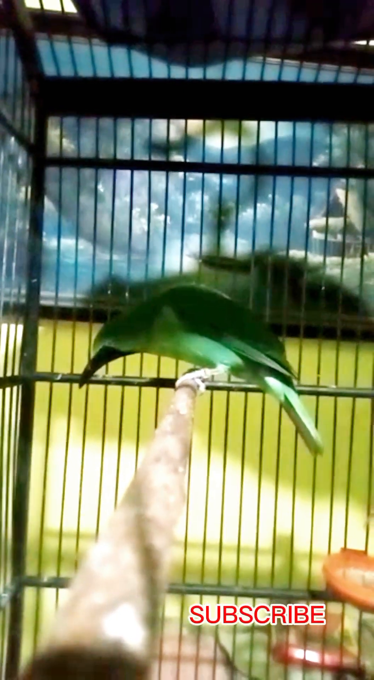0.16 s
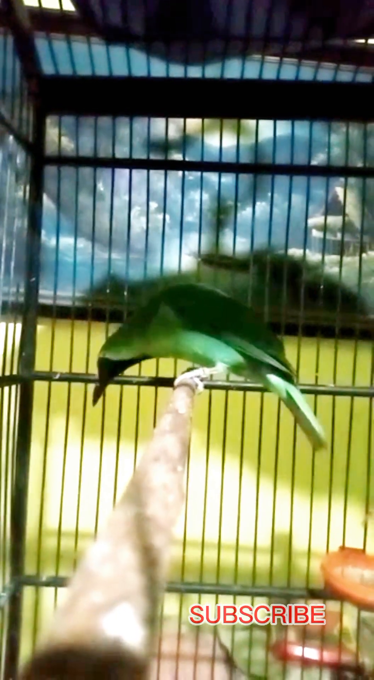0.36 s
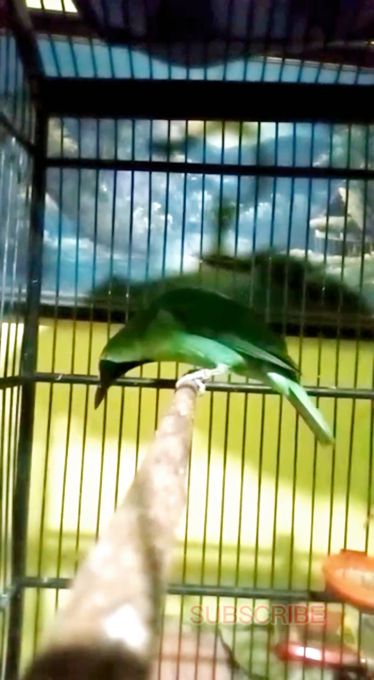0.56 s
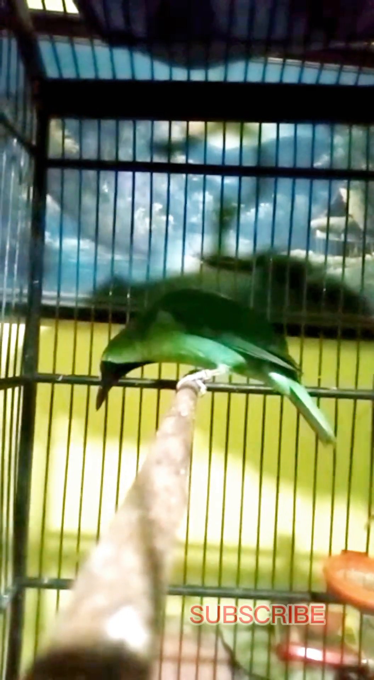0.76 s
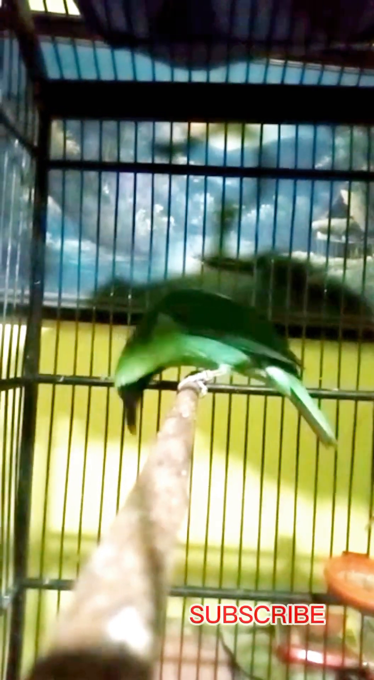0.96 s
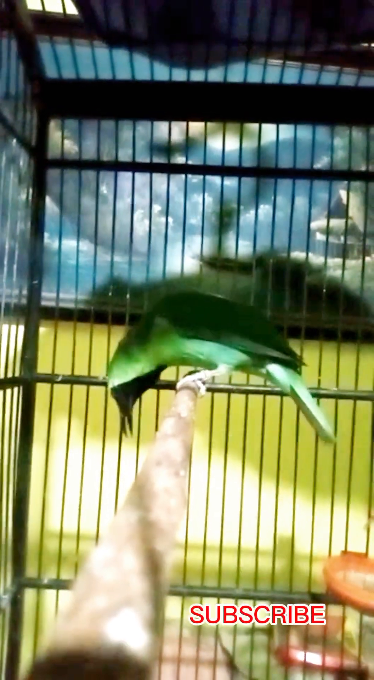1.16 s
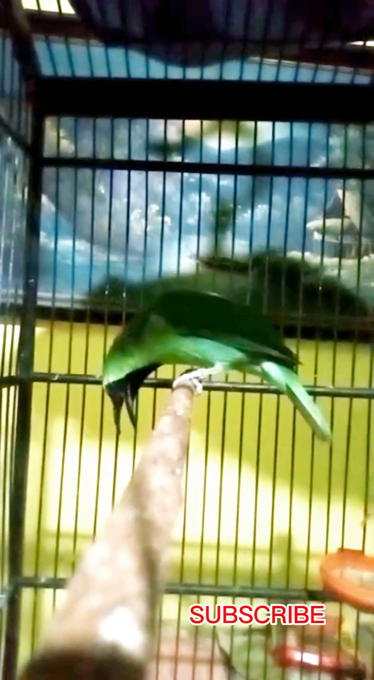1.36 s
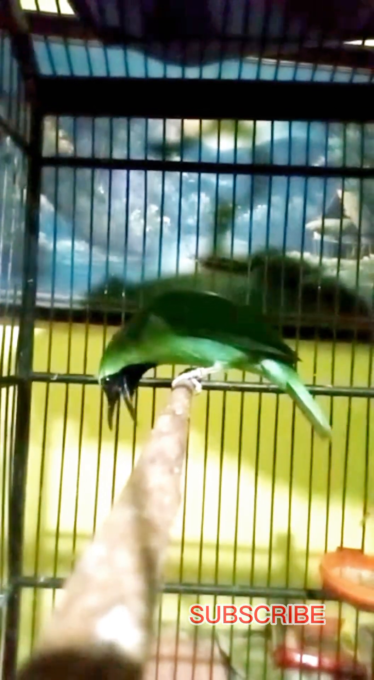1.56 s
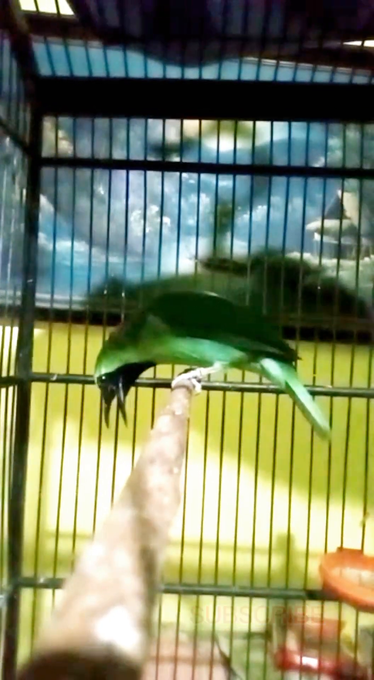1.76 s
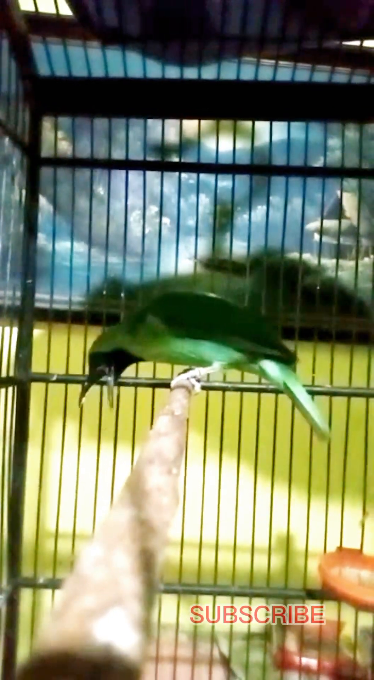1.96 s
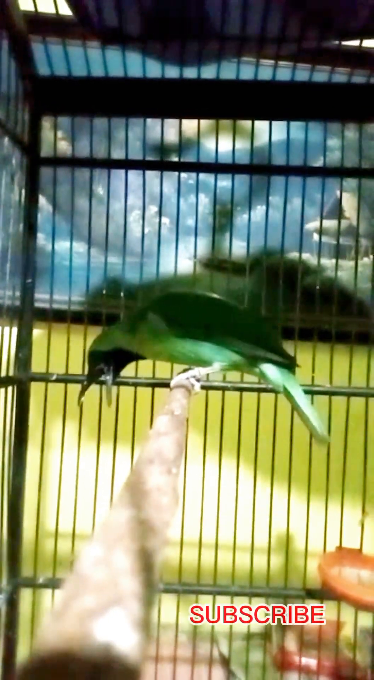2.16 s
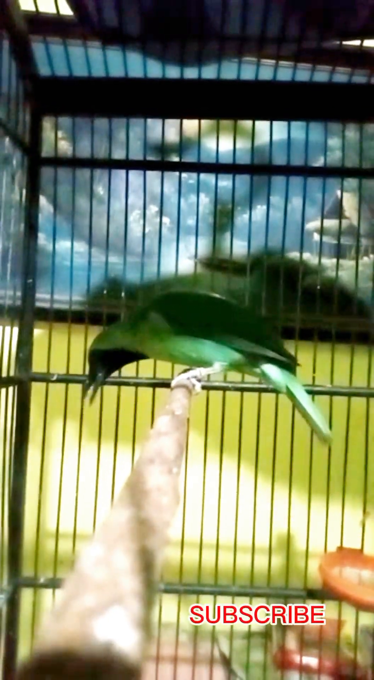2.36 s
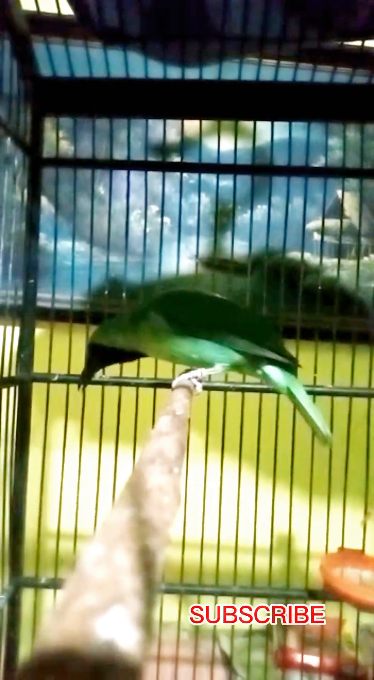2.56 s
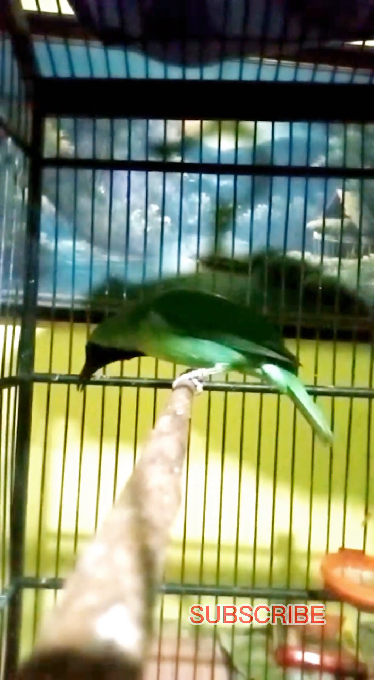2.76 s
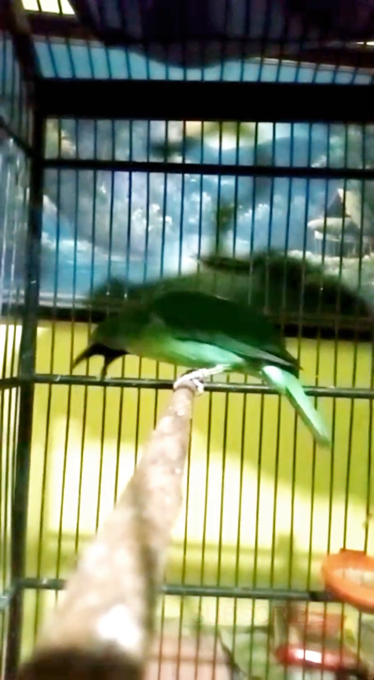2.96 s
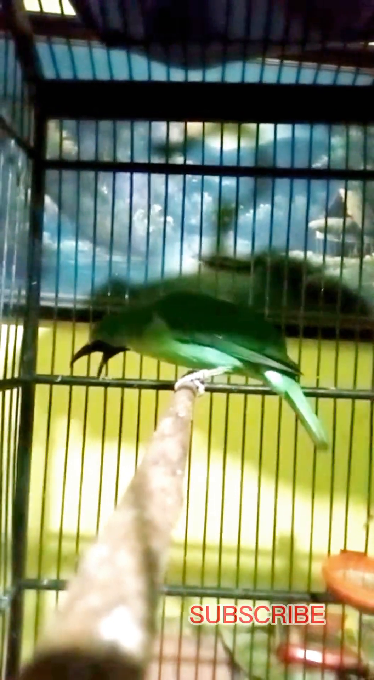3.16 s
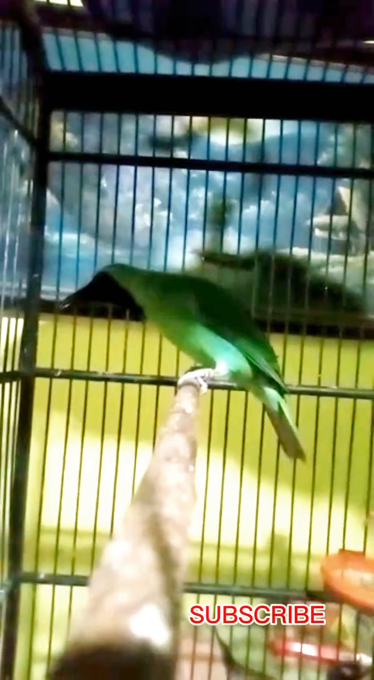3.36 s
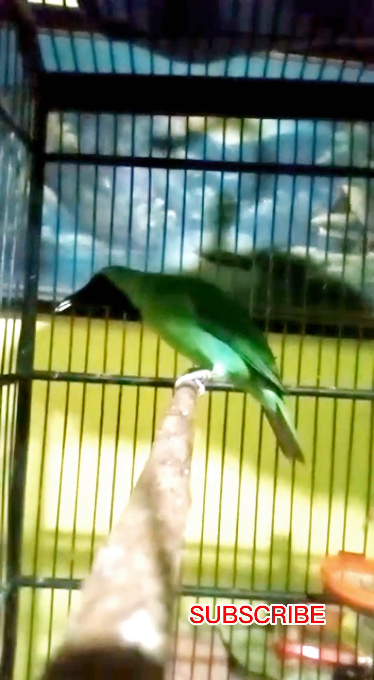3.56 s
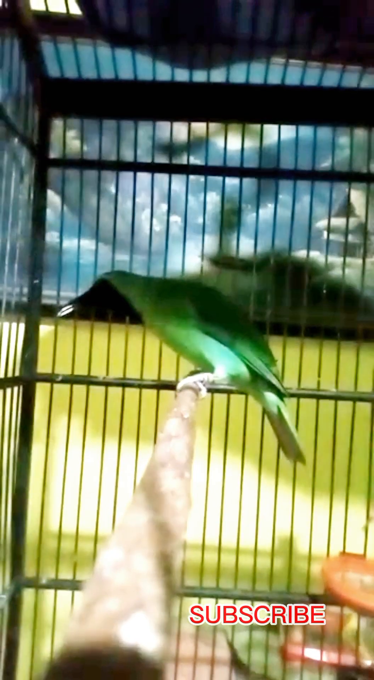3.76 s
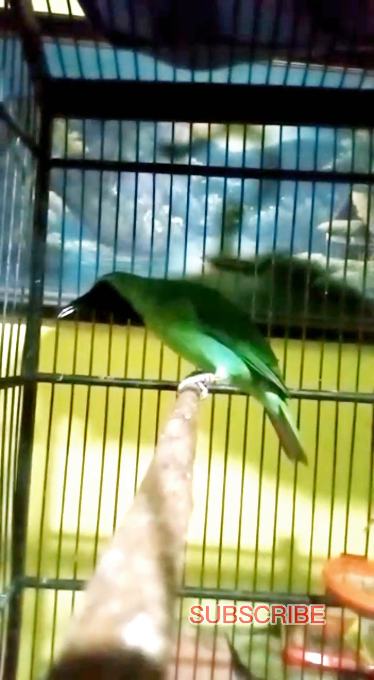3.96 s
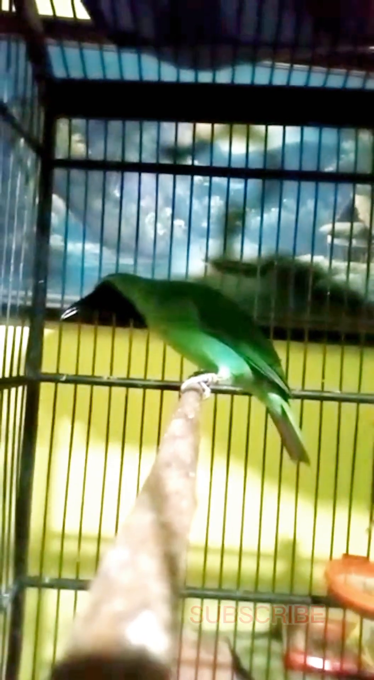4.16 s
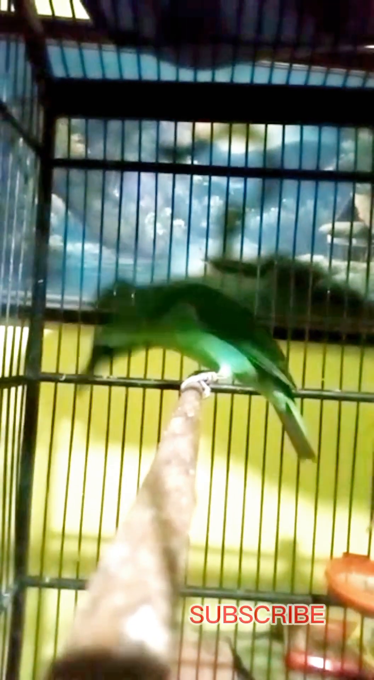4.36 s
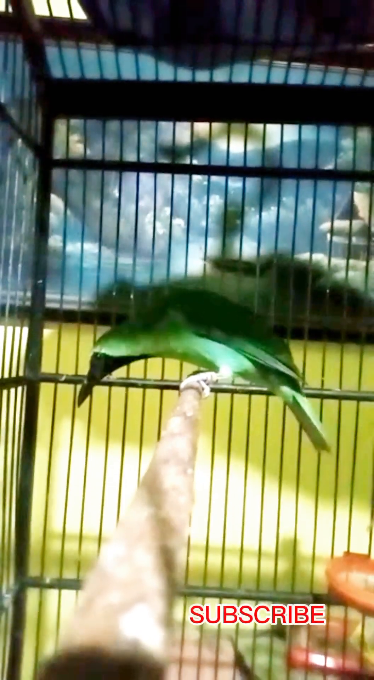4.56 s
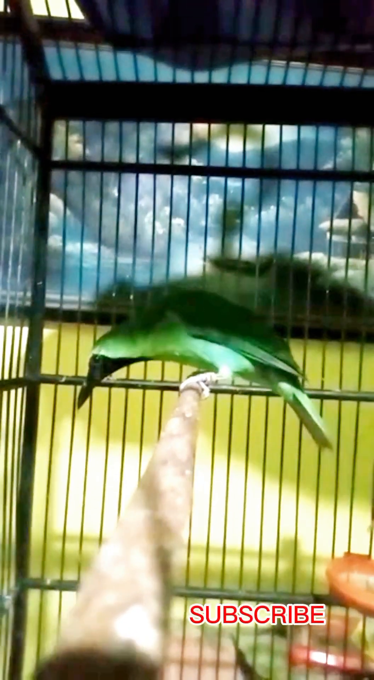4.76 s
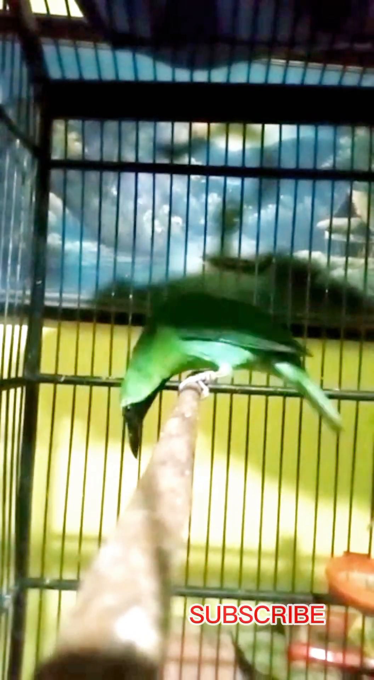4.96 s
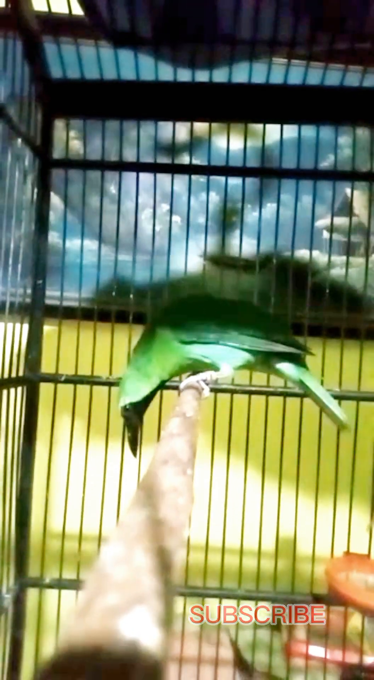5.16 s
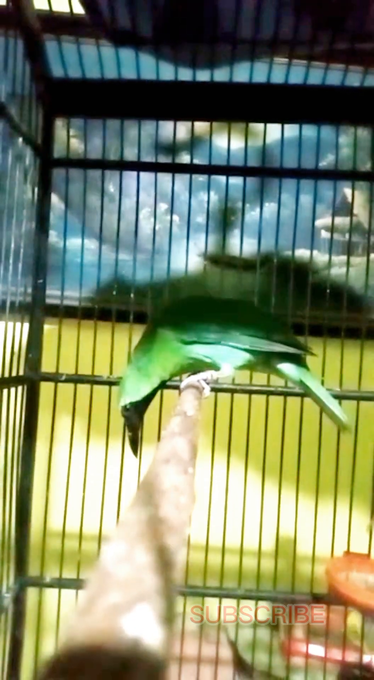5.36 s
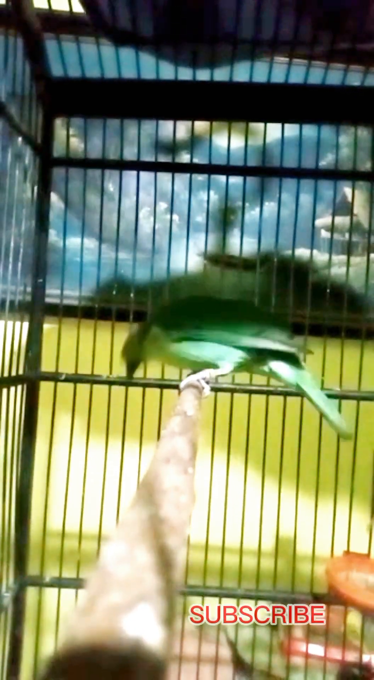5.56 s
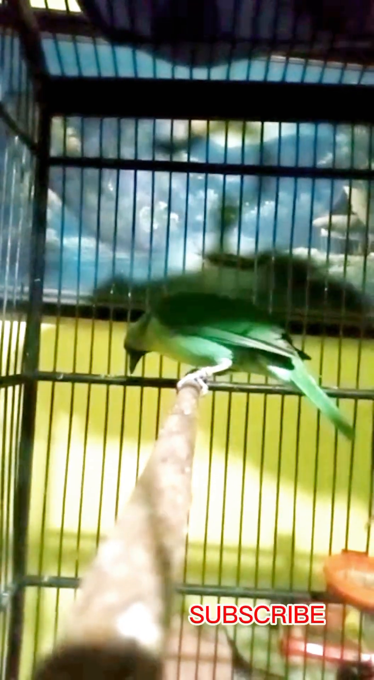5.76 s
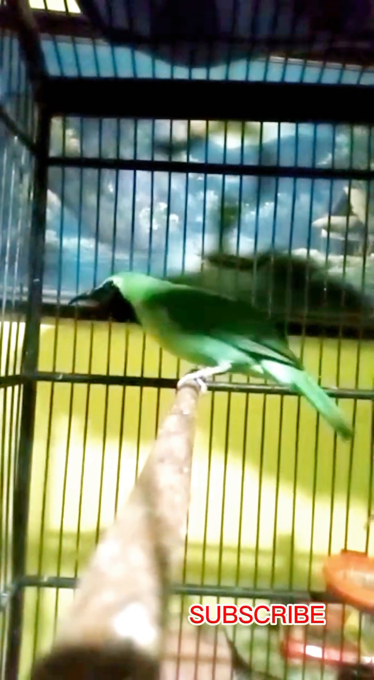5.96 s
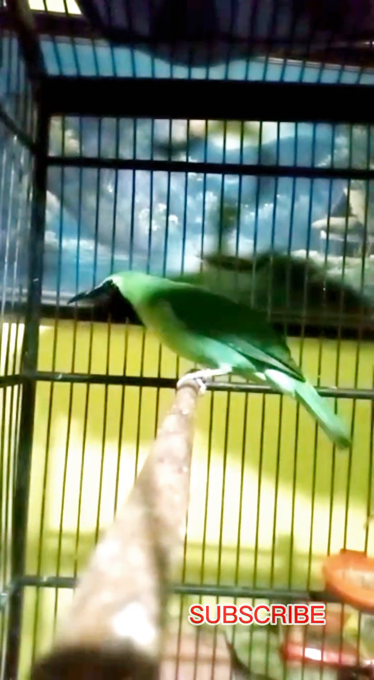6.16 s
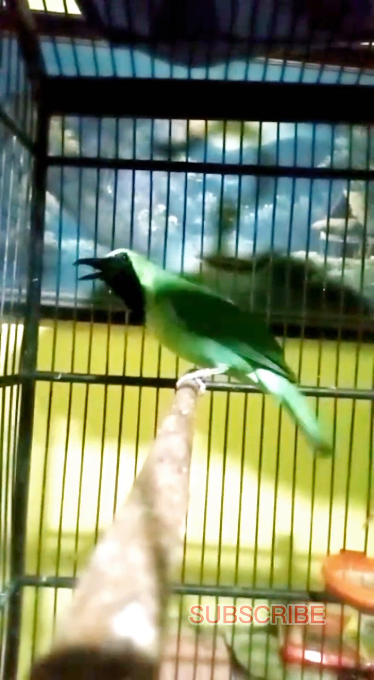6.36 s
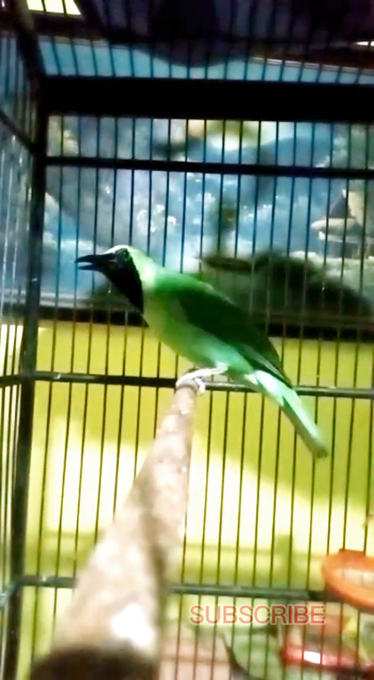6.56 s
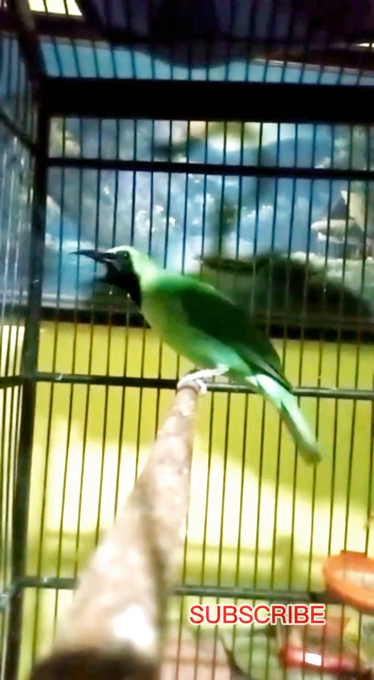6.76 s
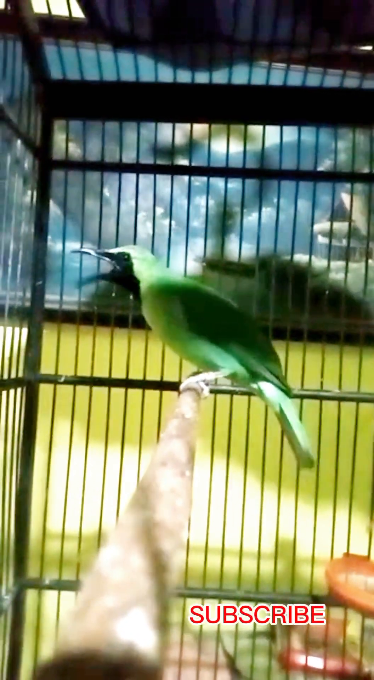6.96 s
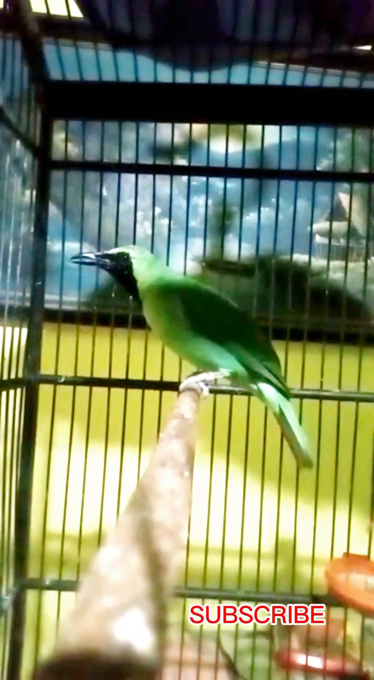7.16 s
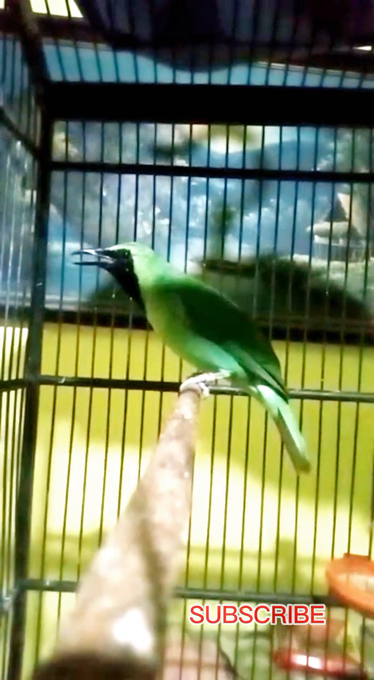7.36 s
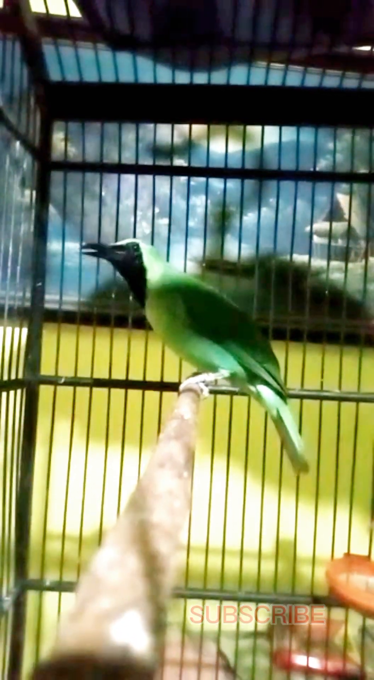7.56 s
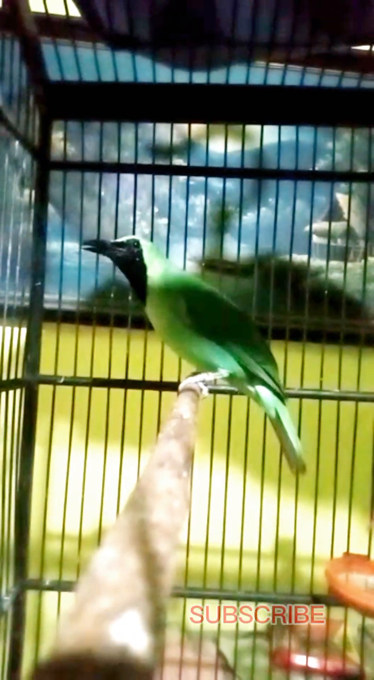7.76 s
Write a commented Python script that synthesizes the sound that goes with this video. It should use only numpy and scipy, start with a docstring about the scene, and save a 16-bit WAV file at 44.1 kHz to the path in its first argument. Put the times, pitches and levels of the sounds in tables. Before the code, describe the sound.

Bright bursts of whistled notes, chattering chips and rapid downward trills from a close bird, with distant harsh rasps, blurred whistles and a faint wavering hum.

```python
"""A caged songbird sings close by in a hard-walled room: whistles, chips and falling trills, built from
nearly pure gliding tones with overtones, breath and a reverberant tail. Tongue ticks, air puffs and thuds go with it.
Farther off, rasping calls (fluttering noise) and blurred whistles of another bird sound over a wavering low hum.
Thin tones, soft rustles and dull knocks are fainter still. Gain control ducks the hum under the song,
a limiter catches the loudest notes, and a cut with short fades joins two shots."""
import sys
import numpy as np
from scipy import signal
from scipy.io import wavfile
from scipy.ndimage import uniform_filter1d, minimum_filter1d

SR = 44100
rng = np.random.default_rng(int(sys.argv[2]) if len(sys.argv) > 2 else 0)


def unload_wav(signal):
    """Save mono or channel-first audio to the path in sys.argv[1] as 16-bit WAV at rate SR, clipped to [-1, 1]."""
    wavfile.write(
        sys.argv[1],
        SR,
        np.round(np.clip(np.atleast_2d(signal).T, -1, 1) * 32767).astype(np.int16),
    )


N = 348390
CUT_S = 3.311  # the cut between the two shots

# falling trill notes: (time [s], length [s], high pitch [Hz], low pitch [Hz], level [dB])
FALL_NOTES = [(1.976, 0.027, 5600, 3960, 9.5), (2.045, 0.03, 6600, 3897, 10.7),
              (2.112, 0.032, 6500, 3910, 10.3), (2.185, 0.03, 6700, 3908, 8.3),
              (2.252, 0.028, 6600, 4088, 6.5), (2.896, 0.036, 6300, 4287, 8.6),
              (2.965, 0.045, 6777, 4353, 11.55), (3.035, 0.042, 7094, 4283, 13),
              (3.104, 0.042, 6800, 4257, 10.5), (3.173, 0.04, 6800, 4290, 10.9),
              (3.248, 0.038, 6700, 4055, 7.9)]
# sliding notes: (time [s], length [s], high pitch [Hz], low pitch [Hz], level [dB])
SLIDE_NOTES = [(6.814, 0.04, 5776, 3676, 8.9), (6.891, 0.029, 6134, 3675, 12.4),
               (6.965, 0.025, 5790, 3960, 12.2), (7.041, 0.04, 5480, 3682, 10.9)]


def amp(db):
    """Turns dB into gain."""
    return 10 ** (np.asarray(db) / 20)


def evened(x):
    """Scales to rms 1."""
    return x / np.sqrt(np.mean(x ** 2) + 1e-20)


def smoothed_noise(length, size):
    """Slow random drift: white noise averaged twice over size samples, at rms 1."""
    white = rng.standard_normal(length)
    return evened(uniform_filter1d(uniform_filter1d(white, size=size), size=size))


def read(points, hz):
    """Reads a spectrum on a log-frequency axis."""
    f, value = np.transpose(points)
    return np.interp(np.log(hz + 1), np.log(f + 1), value)


def peaks(modes, hz):
    """Resonances as bumps in dB, each falling to half its dB at half its width from the centre."""
    return sum(db / (1 + (2 * (hz - f) / width) ** 2) for f, width, db in modes)


def envelope(times, levels_db):
    """Gain over the whole scene, silent outside the given times."""
    return amp(np.interp(np.arange(N) / SR, times, levels_db, left=-150, right=-150))


def add(mix, s, sound):
    """Mixes a sound in at time s."""
    part = mix[round(s * SR):][:len(sound)]
    part += sound[:len(part)]


def noise(colour_db, patchy_db):
    """Coloured noise from random 512-sample spectra whose level drifts in patches of time and pitch."""
    a, b, patches = rng.standard_normal((N // 128 + 5, 257, 3)).T
    patches = uniform_filter1d(patches, size=5, axis=0)
    patches = evened(uniform_filter1d(patches, size=14, axis=1))
    z = (a + 1j * b) * amp(colour_db[:, None] + patchy_db * patches)
    return evened(signal.istft(z, nperseg=512, noverlap=384)[1][:N])


def bursts(events, low_hz, high_hz, rise, decay):
    """Short bursts of band noise with set peaks; rise and decay are time constants in seconds."""
    out, t = np.zeros(N), np.arange(7000) / SR
    band = signal.butter(2, [low_hz, high_hz], "band", fs=SR, output="sos")
    for s, db in events:
        swell = (1 - np.exp(-t / rise)) * np.exp(-t / decay)
        burst = signal.sosfilt(band, rng.standard_normal(len(t)) * swell)
        add(out, s, amp(db) * burst / abs(burst).max())
    return out


def whistle(hz, db, overtones_db, breath_db, size):
    """A nearly pure syrinx tone; uneven overtones fade less than the tone; breath noise sits just under it."""
    # (multiple of the pitch, level at full effort before the note's brightness [dB])
    overtones = [(2, -43), (3, -55), (4, -61), (5, -63.5)]
    # beak resonance, lifts the overtones that cross it: (centre [Hz], width [Hz], lift [dB])
    beak = [(7700, 880, 9.5)]
    turn = 2 * np.pi * (np.cumsum(uniform_filter1d(hz, size=60)) / SR + rng.random())
    uneven = 1 + .4 * evened(uniform_filter1d(rng.standard_normal(len(hz)), size=300))
    upper = 0
    for k, d in overtones:
        audible = k * hz < SR / 2  # nothing above half the sample rate
        upper = upper + amp(d + peaks(beak, k * hz)) * np.sin(round(k) * turn) * audible
    breath = np.sin(.84 * turn) * smoothed_noise(len(hz), size)
    overtone_gain = amp(overtones_db - 0.56 * (db - db.max()))
    tone = np.sin(turn) + overtone_gain * uneven * upper + amp(breath_db) * breath
    soft_ends = signal.windows.tukey(len(hz), min(1, 200 / len(hz)))
    return amp(db) * tone * soft_ends


def hum():
    """Lumpy low rumble in narrow bands with a faint hiss above it, its level wavering."""
    # spectrum: (frequency [Hz], relative level [dB])
    hum_colour = [(20, -55.5), (45, -36.5), (65, -8.5), (100, -12), (200, -10), (290, -13), (490, -36),
                  (800, -34.5), (1600, -29.5), (2800, -29), (5000, -50), (15000, -68)]
    # narrow humming bands: (centre [Hz], width [Hz], lift [dB])
    hum_bands = [(78.4, 16, 14), (144, 72, 11), (196, 2.8, 8)]
    # (time [s], level [dB])
    hum_level = [(0, -35), (1.102, -34.5), (3.5, -41), (4.3, -30.5), (5.202, -37.5), (5.8, -34.5),
                 (6.399, -44.5), (6.898, -28), (7.9, -37.5)]
    a, b, sway = rng.standard_normal((N // 2048 + 5, 4097, 3)).T
    sway = uniform_filter1d(sway, size=12, axis=0)
    sway = evened(uniform_filter1d(sway, size=2, axis=1))
    hz = np.fft.rfftfreq(8192, 1 / SR)
    colour_db = read(hum_colour, hz) + peaks(hum_bands, hz)
    z = (a + 1j * b) * amp(colour_db[:, None] + 4.2 * sway)
    rumble = evened(signal.istft(z, nperseg=8192, noverlap=6144)[1][:N])
    return envelope(*np.transpose(hum_level)) * rumble


def rustles():
    """Soft rustles: dull noise that swells and sinks."""
    # (time [s], rise [s], fall [s], level at the top [dB], both ends relative to the top [dB])
    rustle_events = [(3.45, 0.29, 0.22, -39, -24.5), (6.745, 0.044, 0.24, -15, -19.5)]
    # spectrum: (frequency [Hz], relative level [dB])
    rustle_colour = [(400, -31), (900, -11), (1500, -7.5), (3000, 4), (5000, -18.5), (8000, -25.5),
                     (15000, -72)]
    swells = sum(envelope([s, s + rise, s + rise + fall], [db + ends_db, db, db + ends_db])
                 for s, rise, fall, db, ends_db in rustle_events)
    return swells * noise(read(rustle_colour, np.fft.rfftfreq(512, 1 / SR)), patchy_db=-1.5)


def knocks():
    """Dull soft knocks: slow-swelling bursts of low-mid noise."""
    # (time [s], peak [dB])
    bumps = [(3.605, -34.5), (3.65, -28.5), (3.7, -34), (4.79, -43.5)]
    return bursts(bumps, 380, 1000, rise=0.0073, decay=0.039)


def rasps():
    """Harsh calls: turbulent noise through throat resonances, chopped by uneven flutter near 100 a second."""
    # (time [s], swell [s], level at the top [dB])
    rasp_calls = [(-.06, 0.077, -23.5), (0.163, 0.075, -20.5), (0.391, 0.082, -21.5), (.668, 0.082, -22),
                  (5.088, 0.06, -22.5), (5.274, 0.067, -21.5), (5.501, 0.065, -19.5), (5.809, 0.095, -21)]
    # spectrum: (frequency [Hz], relative level [dB])
    rasp_colour = [(290, -25), (500, -26.5), (694, -19), (1130, 2.5), (1320, -5), (1700, -0.5),
                   (2230, -10.5), (2430, -3), (3610, 0.5), (5160, -14), (8730, -26.5), (10800, -48),
                   (15000, -42)]
    # throat resonances: (centre [Hz], width [Hz], lift [dB])
    throat = [(1172, 120, 3.5), (1598, 120, 4.5), (2351.7, 36, 19.5), (3150, 250, 0.5), (6740, 690, 6)]
    onset_s, onset_db, swell_db = 0.023, -19, -6  # a quick onset, then a slower swell to the top
    fade_db_per_s = 112.5
    hz = np.fft.rfftfreq(512, 1 / SR)
    flutter_band = signal.butter(1, [50, 200], "band", fs=SR, output="sos")
    flutter = evened(signal.sosfilt(flutter_band, rng.standard_normal(N)))
    colour_db = read(rasp_colour, hz) + peaks(throat, hz)
    steps_db = np.array([onset_db, swell_db, 0, -fade_db_per_s])
    calls = sum(envelope([s, s + onset_s, s + swell, s + swell + 1], db + steps_db)
                for s, swell, db in rasp_calls)
    return calls * evened(noise(colour_db, patchy_db=2.5) * amp(0.85 * flutter))


def far_bird():
    """Unsteady, breathy whistles that climb, level off and sag, plus thin gliding tones, all dulled."""
    # rising whistles: (time [s], length [s], low pitch [Hz], high pitch [Hz],
    # mid-climb [share of length], spread of the climb [share of length], level at the loudest [dB])
    far_whistles = [(3.313, 0.26, 2083, 2385, 0.18, 0.085, -21.5),
                    (3.598, 0.28, 2037, 2384, 0.29, 0.068, -14),
                    (3.852, 0.24, 1642, 1908, 0.12, 0.086, -11.5), (4.047, .22, 1889, 3313, .22, .15, -5.5),
                    (4.278, 0.17, 2591, 3090, .33, 0.099, -8), (7.82, .13, 4048, 4810, 0.14, 0.083, -7)]
    # faint thin tones: (time [s], length [s], start pitch [Hz], end pitch [Hz], start [dB], end [dB])
    thin_tones = [(0, 1.2, 3290, 3174, -38.5, -36), (5.093, 0.13, 5350, 5370, -14.5, -59)]
    loudest, start_db, end_db = 0.33, -9.5, -11  # share of the length; ends relative to the loudest
    sag = 0.41  # share of the pitch range
    far_waver, thin_waver = .02, .01  # rms share of the pitch
    out = np.zeros(N)
    notes = []
    for s, length, low_hz, high_hz, middle, spread, db in far_whistles:
        u = np.arange(0, 1, 1 / (length * SR))
        swell_db = np.interp(u, [0, loudest, 1], [start_db, 0, end_db])
        height = 1 / (1 + np.exp((middle - u) / spread)) - sag * u ** 4
        notes.append((s, low_hz + (high_hz - low_hz) * height, db + swell_db, far_waver))
    for s, length, start_hz, end_hz, first_db, last_db in thin_tones:
        u = np.arange(0, 1, 1 / (length * SR))
        glide_hz = start_hz + (end_hz - start_hz) * u
        notes.append((s, glide_hz, first_db + (last_db - first_db) * u, thin_waver))
    for s, hz, db, unsteady in notes:
        hz = hz * (1 + unsteady * smoothed_noise(len(hz), 300))
        add(out, s, whistle(hz, db, overtones_db=5., breath_db=-19., size=60))
    dull = signal.butter(2, 8000., fs=SR, output="sos")
    return signal.sosfilt(dull, out)


def thuds():
    """Low thuds, the perch shaken: abrupt bursts of bass noise."""
    # (time [s], peak [dB])
    perch_thuds = [(6.822, 11), (6.9, 6)]
    return bursts(perch_thuds, 104, 282, rise=0.00037, decay=0.0092)


def puffs():
    """Falling and sliding notes blow air on the microphone: low bursts that grow steeply with note level."""
    lag_s, slope = 0.0086, 5  # slope in dB of puff per dB of note
    middling_db, middling_puff_db = 12.5, -1
    events = [(s + lag_s, middling_puff_db + slope * (db - middling_db))
              for s, *_, db in FALL_NOTES + SLIDE_NOTES]
    return bursts(events, 65.3, 350, rise=0.0026, decay=0.012)


def tongue_ticks():
    """Tongue ticks just before notes: millisecond bursts of mid-range noise."""
    # (time [s], peak before placing in the room [dB])
    ticks = [(1.117, -17), (1.357, -8), (1.462, -12.5), (1.622, -13.5), (1.708, -19.5), (1.791, -16),
             (1.953, -18), (2.468, -18.5), (2.476, -15.5), (2.646, -21.5), (2.87, -17.5), (6.073, -10),
             (6.169, -22), (6.264, -13.5), (6.52, -3), (6.79, -11.5), (7.332, -7), (7.341, -7.5),
             (7.49, -15.5), (7.675, -14), (7.685, -22)]
    return bursts(ticks, 890, 2000, rise=0.0001, decay=0.0011)


def song():
    """The close bird: each note stretches its shape to its own pitch range; each shape has its room send."""
    # note shapes: (time [share of the note length], pitch [0 low to 1 high], effort [dB])
    slur = [(0, .6, -18.5), (.06, 1, -7), (.2, 1, 4.5), (.3, .55, 3.5), (.42, .1, -7), (.63, 0, -4),
            (.79, .42, -2), (.92, .4, -2.5), (1.02, 0.15, -9)]
    arch = [(0, .2, -16.5), (.2, .8, 1.5), (.4, 1, 2.5), (.65, 1, 1), (1, 0, -0.5), (1.12, -0.17, -1.5)]
    chip = [(0, .6, -20), (.15, .86, -7.5), (.3, 0.91, -13), (.42, .88, 6.5), (.54, .65, 1.5),
            (.7, .35, -12), (1, 0.034, -20), (1.12, 0.17, -8.5)]
    chew = [(0, .44, -12.5), (.2, .85, 2), (.33, 0.99, -7), (.48, .76, 6.5), (.62, .56, 3.5),
            (.72, .42, -5), (1, 0.07, -7.5), (1.12, -.1, -26)]
    fall = [(0, 0.95, -6.5), (.1, .88, -12.5), (.29, .5, -8.5), (.38, .36, -0.5), (.6, .16, 6),
            (.85, 0.051, -1), (1, 0, -10.5), (1.15, 0.23, -42)]
    slide = [(0, 0.93, -16), (.2, 0.96, -0.5), (.6, .4, 10.5), (1, 0, -5.5), (1.12, 0.35, -42)]
    hook = [(0, 0.076, 3.5), (.2, .6, 8.5), (.32, .88, -5.5), (.45, 0.96, -9.5), (.6, .9, -10.5),
            (.75, 0.79, -12.5), (.87, .7, 3.5), (1, 0.72, 1), (1.1, 0.28, -25)]
    rise_shape = [(0, 0, -10.5), (.5, .6, -3), (1, 1, -10)]
    # notes: (time [s], length [s], high pitch [Hz], low pitch [Hz], level before effort [dB])
    slurs = [(1.132, 0.18, 2585, 1985, 16), (6.282, 0.168, 2557, 1954, 16.5)]
    arches = [(1.368, 0.027, 3258, 3000, 17.3), (6.522, 0.039, 3165, 2890, 18.2),
              (6.883, 0.013, 3018, 2750.0, 10), (6.961, 0.0082, 2830, 2830, 14.1),
              (7.039, 0.011, 2680, 2610, 3.2)]
    pipes = [(2.669, 0.028, 1964, 1985, 11.7)]
    chips = [(1.481, 0.027, 4150, 2045, 13.2), (1.555, 0.027, 4150, 2106, 9.2),
             (1.643, 0.023, 4300, 2014, 14.3), (1.726, 0.027, 4150, 2000, 14),
             (1.808, 0.028, 4050, 1993, 11), (1.886, 0.023, 4100, 2117, 9.4)]
    chews = [(2.483, 0.044, 3728, 2043, 10), (7.347, 0.042, 3786, 1842, 11),
             (7.504, 0.041, 3514, 1897, 9.5), (7.692, 0.039, 3573, 1893, 8.9)]
    hooks = [(5.906, 0.045, 4440, 2092, 6.7), (5.987, 0.04, 4220, 2440, 9.1),
             (6.091, 0.037, 4300, 2254, 5.5), (6.184, 0.046, 4244, 2496, 7.3)]
    strokes = [(5.9, 0.012, 5330, 2510, 3)]
    # shape, notes, room send [dB], overtone brightness [dB]
    voices = (
        (slur, slurs, -10., -2.), (arch, arches, -6., -3.), (arch, pipes, -6., 7.),
        (chip, chips, -1., -3.), (chew, chews, 0., -3.), (fall, FALL_NOTES, -5., 8.),
        (slide, SLIDE_NOTES, -5., 7.), (hook, hooks, -3., 3.), (rise_shape, strokes, -9., -5.))
    direct, send = np.zeros((2, N))
    for shape, notes, room_db, bright_db in voices:
        share, height, effort_db = np.transpose(shape)
        for s, length, high_hz, low_hz, db in notes:
            u = np.arange(0, share[-1], 1 / (length * SR))
            hz = low_hz * (high_hz / low_hz) ** np.interp(u, share, height)
            note_db = db + np.interp(u, share, effort_db)
            note = whistle(hz, note_db, overtones_db=bright_db, breath_db=-44.0, size=3)
            add(direct, s, note)
            add(send, s, amp(room_db) * note)
    return direct, send


def near_walls(x):
    """First reflections from cage and walls, of alternating sign."""
    # (delay [s], level [dB])
    reflections = [(.0023, -11.5), (.0047, -12.5), (.0081, -11.5), (.0124, -13), (.0187, -28.5),
                   (.026, -25)]
    out = x.copy()
    for k, (delay, db) in enumerate(reflections):
        add(out, delay, (-1) ** k * amp(db) * x)
    return out


def room(x, longer):
    """Reverb of sparse taps of uneven size, each band dying at its own speed; the cut ends the tail."""
    # (frequency [Hz], time to fall 60 dB before the factor longer [s], relative level [dB])
    room_bands = [(500, 1, -26), (2070, 0.72, 8), (3499.2, 0.89, -1.5), (4500, 0.71, -1), (7650, 0.66, 1.5),
                  (15000, 0.31, 12)]
    # far walls answer late: (time [s], level [dB])
    build_up = [(0, -12.5), (.025, -4.5), (.06, -3.5), (.095, 0), (.12, -3.5), (.2, -4.5)]
    taps, cut = np.zeros(SR), round(CUT_S * SR)
    at = np.arange(300, SR - 24, 24)
    taps[at + rng.integers(0, 24, len(at))] = rng.standard_normal(len(at))
    hz, t, z = signal.stft(taps, SR, nperseg=256)
    f, t60, colour_db = np.transpose(room_bands)
    decay_db = -60 * t / (longer * np.interp(hz, f, t60)[:, None])
    decay_db = decay_db + np.interp(t, *np.transpose(build_up))
    band_db = np.interp(hz, f, colour_db)[:, None]
    tail = signal.istft(z * amp(decay_db + band_db), SR, nperseg=256)[1]
    tail = tail / np.linalg.norm(tail)
    return np.concatenate([signal.fftconvolve(part, tail)[:len(part)] for part in (x[:cut], x[cut:])])


def scene():
    """Close bird with its room, far calls mostly as reflections or dry rasps, and the background."""
    bird, send = song()
    ticks, far, harsh = tongue_ticks(), far_bird(), rasps()
    close = amp(3.0) * near_walls(bird + ticks) + room(send + amp(-3.5) * ticks, longer=0.8)
    distant = amp(-15.5) * near_walls(far) + room(far, longer=0.6)
    distant += amp(-2.5) * harsh + amp(-5.5) * room(harsh, longer=0.1)
    air = puffs() + knocks() + thuds()
    return (close + distant + rustles() + air + hum())[None]


def gain_control(x):
    """Quick fall, slow recovery above a threshold; the bass ducks deeper."""
    threshold_db, recovery_db_per_s = -28.0, 57.7
    duck, bass_duck = 0.47, 0.1  # dB per dB over the threshold; the bass gets both
    bass_hz = 450.
    power_db = 10 * np.log10(abs(uniform_filter1d(x ** 2, size=600)) + 1e-12)
    fall_db = np.arange(len(x)) * recovery_db_per_s / SR
    held_db = np.maximum.accumulate(power_db + fall_db) - fall_db
    over_db = uniform_filter1d(np.maximum(held_db - threshold_db, 0), size=900)
    bass = signal.sosfiltfilt(signal.butter(2, bass_hz, fs=SR, output="sos"), x)
    return (x - bass + bass / amp(bass_duck * over_db)) / amp(duck * over_db)


def limiter(x):
    """Holds peaks at full scale within a fraction of a millisecond, then rounds off what is left."""
    peak = -minimum_filter1d(-abs(x), size=24)
    held = x / uniform_filter1d(np.maximum(peak, 1), size=24)
    return held / (1 + held ** 40) ** (1 / 40)


def record(dry):
    """Gain control per shot, short fades at the cut, peak limiter, microphone tone curve, band limit."""
    # microphone tone curve: (frequency [Hz], level [dB])
    mic_curve = [(20, -4), (11000, 1.5), (13500, 2), (16000, 0)]
    edge_hz = 15480  # top of the band
    cut = round(CUT_S * SR)
    since = (np.arange(N) - cut) / SR
    fade = np.minimum(np.maximum(since / 0.021, -since / 0.0051), 1)  # 5.1 ms out, 21 ms in
    ducked = fade * np.concatenate([gain_control(dry[0, :cut]), gain_control(dry[0, cut:])])
    limited = limiter(ducked)
    hz = np.linspace(0, SR / 2, 65)
    mic = signal.firwin2(63, hz, amp(read(mic_curve, hz)), fs=SR)
    coloured = signal.oaconvolve(limited, mic, "same")
    low_pass = signal.firwin(511, edge_hz, window=("kaiser", 9), fs=SR)
    return signal.oaconvolve(coloured, low_pass, "same")[None]


dry = scene()
out = record(dry)
unload_wav(out)
```